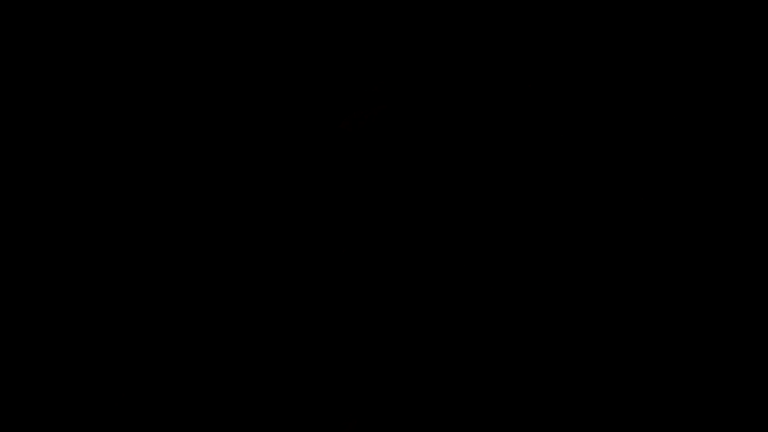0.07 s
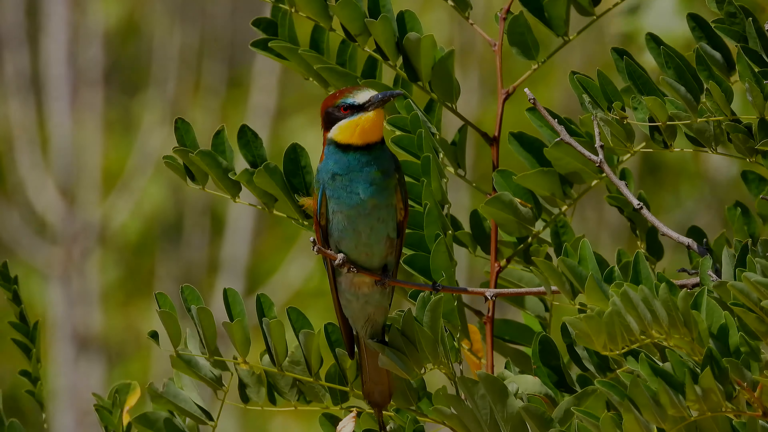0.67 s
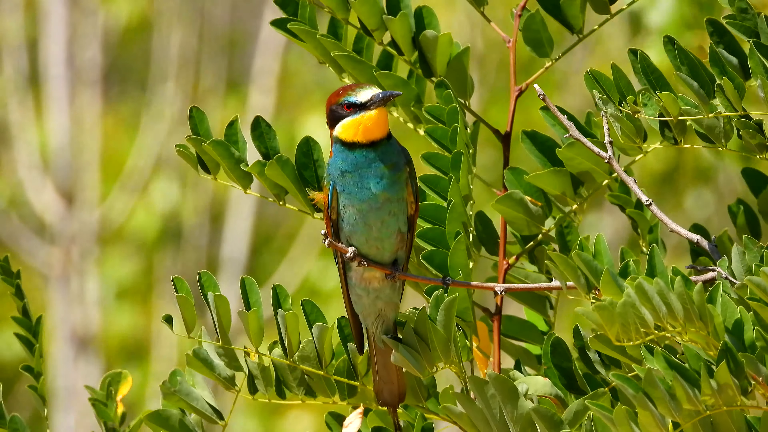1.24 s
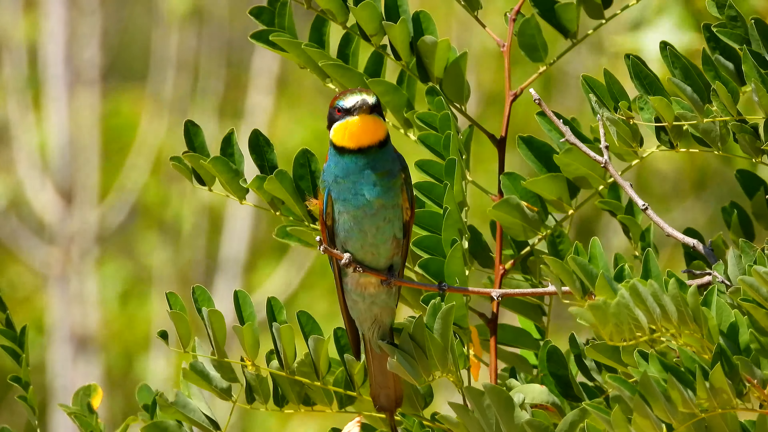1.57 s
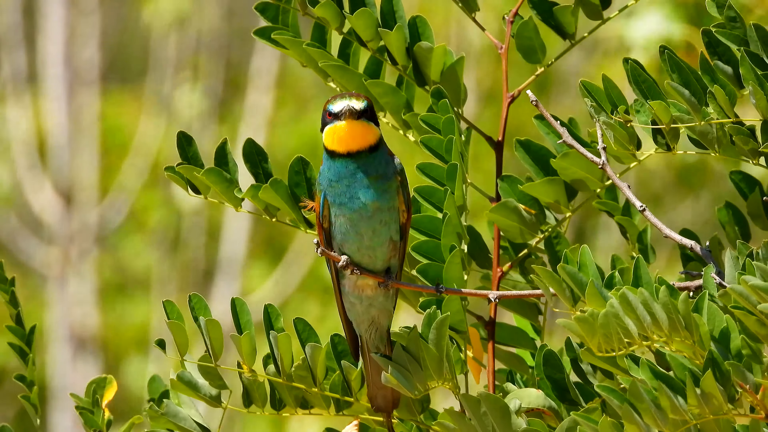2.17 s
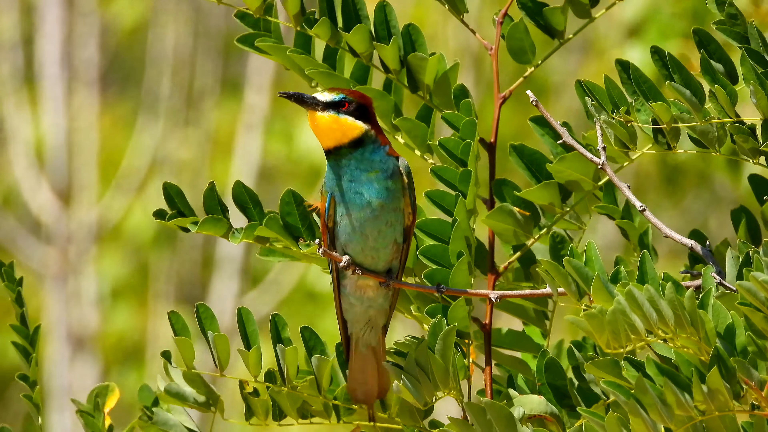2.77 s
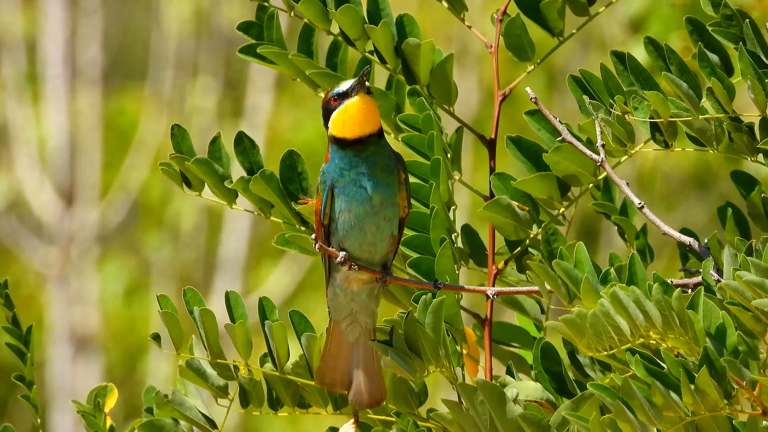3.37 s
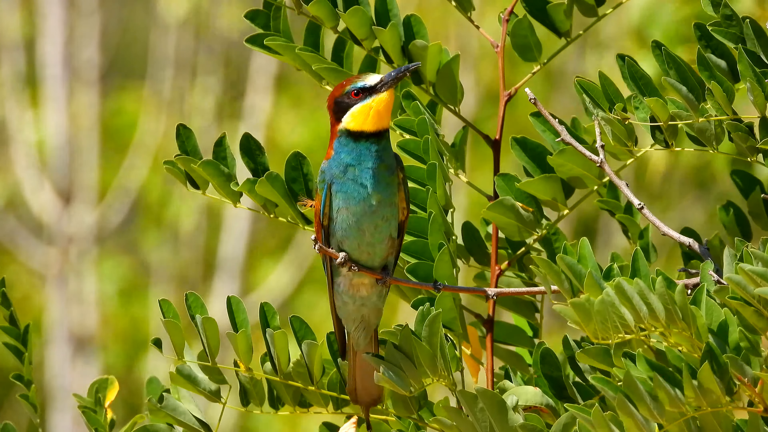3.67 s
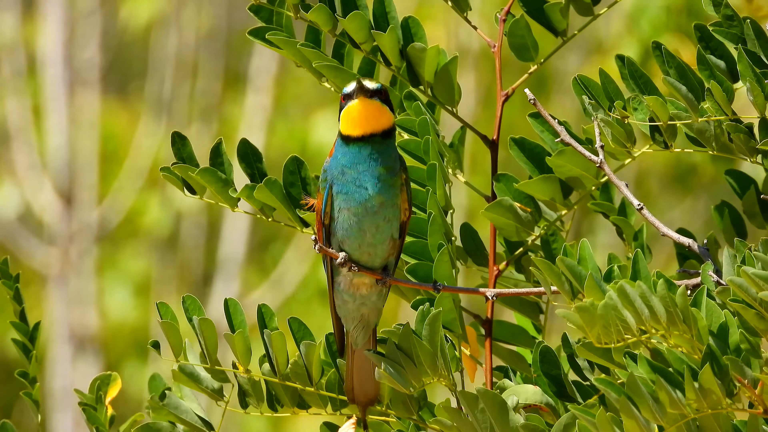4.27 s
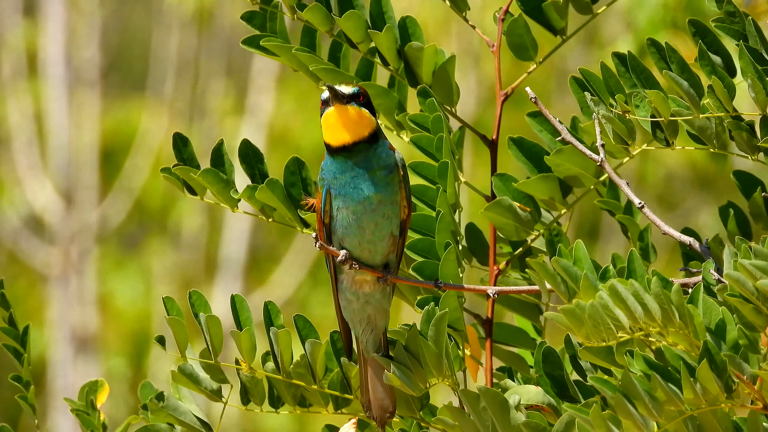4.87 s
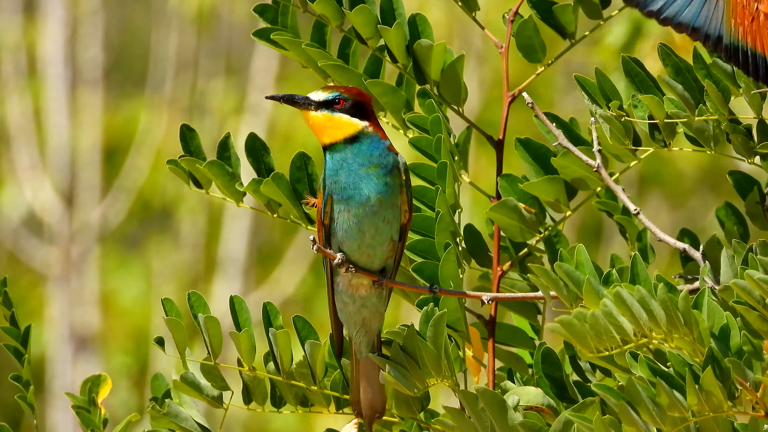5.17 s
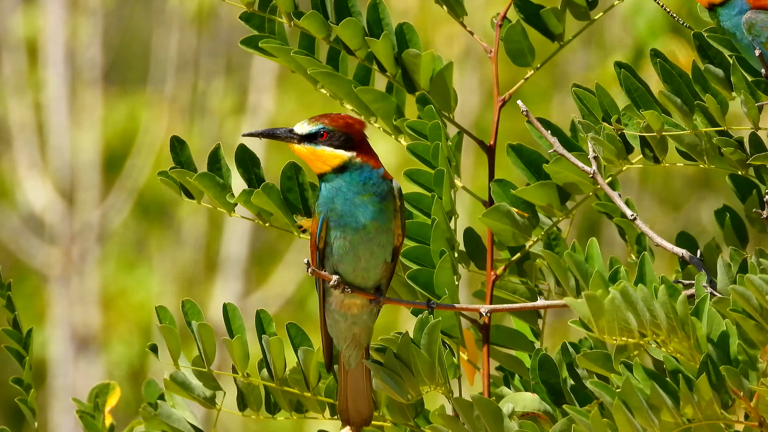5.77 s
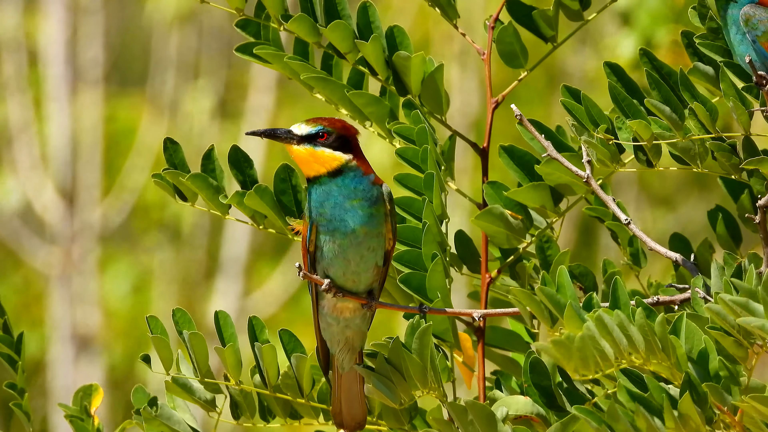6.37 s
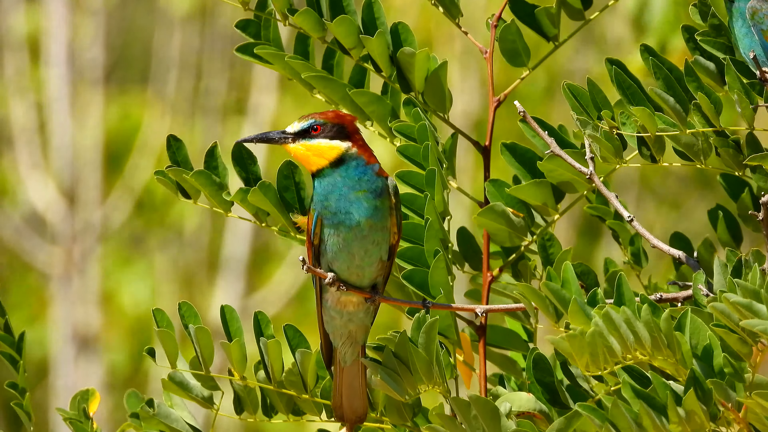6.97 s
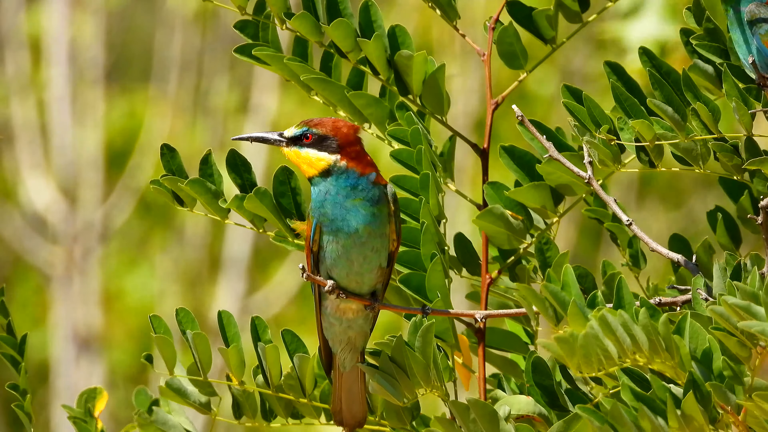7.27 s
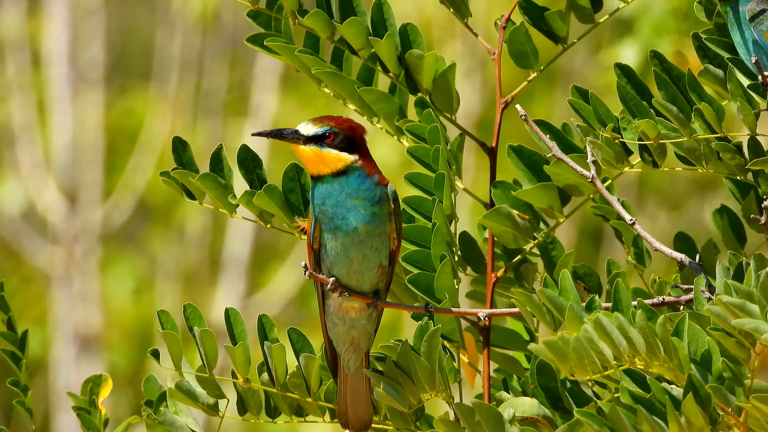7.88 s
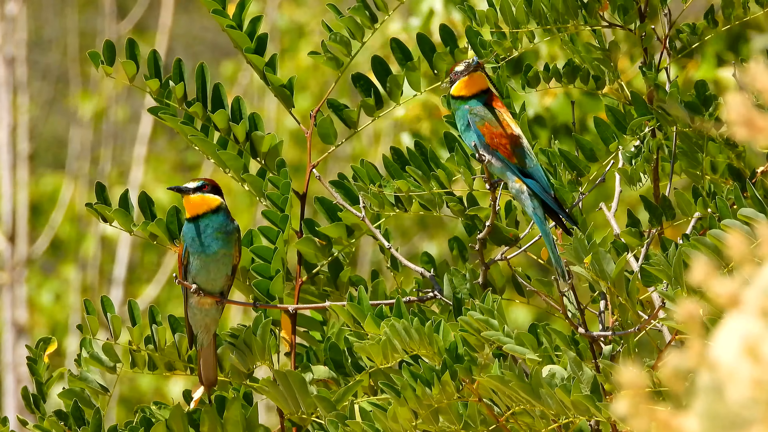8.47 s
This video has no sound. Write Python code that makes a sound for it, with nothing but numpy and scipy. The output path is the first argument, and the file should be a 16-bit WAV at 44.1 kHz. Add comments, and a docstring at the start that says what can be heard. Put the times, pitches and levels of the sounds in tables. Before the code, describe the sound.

A flock of bee-eaters fades in, giving short rolling calls at a distance, softly blurred by the surrounding leaves. About three seconds in, one bird close to the microphone starts a run of slurred whistles, sharp pips and a couple of liquid rolls. It stops around six seconds and the flock carries on. A small songbird twitters very faintly, over a light outdoor hiss and rumble.

```python
"""Bee-eaters in leafy trees

One close bird whistles slurred calls that sink to a whine and end in sharp pips, and a few liquid rolls.
The flock gives the same roll further off, smeared by echoes from the leaves. A small songbird twitters
in bouts and another gives thin calls, over a faint hiss and rumble. The whole sound fades in."""
import sys
import numpy as np
from scipy import signal
from scipy.fft import rfft, irfft, next_fast_len
from scipy.io import wavfile
from scipy.ndimage import uniform_filter1d, minimum_filter1d, map_coordinates

SR = 44100
rng = np.random.default_rng(int(sys.argv[2]) if len(sys.argv) > 2 else 0)


def dump(signal):
    """Clip the signal to [-1, 1] and save it as 16-bit WAV at the path in sys.argv[1]."""
    limited = np.clip(np.atleast_2d(signal).T, -1, 1)
    pcm = np.round(limited * 32767).astype(np.int16)
    wavfile.write(sys.argv[1], SR, pcm)


N = 379701

# a roll is a run of flicks (quick jumps in pitch); this is its rhythm at normal pace
LEAD_S, SECOND_FLICK_S, FLICK_GAP_S, CLOSE_S = .043, .026, .0125, .034


def close_bird(edge_s=.005, echo_db=-19, fizz_db=-58):
    """The nearest bee-eater: slurs, pips that cut into their whines, and rolls."""
    # slurred calls: start_s, loud_s, top_hz, whine_hz, level_db, whine_db
    slurs = [(3.203, 0.016, 2298, 1426, -9.5, -37.5), (3.391, 0.042, 2080, 1543, -8, -29),
             (3.641, .028, 2500, 1510, -8.5, -30), (4.56, 0.033, 2425, 1489, -6.5, -29.5),
             (4.745, 0.021, 2426, 1589, -5, -25), (4.986, .031, 2499, 1547, -4.5, -25.5),
             (5.254, .029, 2448, 1507, -5, -30.5)]
    # sharp pips: start_s, length_s, pitch_hz, glide_hz, level_db
    pips = [(3.361, 0.011, 1799, -52.5, -17.5), (3.52, 0.011, 1790, -200, -11.5),
            (3.55, 0.023, 1780, -200, -9), (3.804, .027, 1682, -280, -12.5), (4.722, 0.014, 1893, 305, -12),
            (4.871, .013, 1885, -150, -7), (4.9, 0.023, 1786, -150, -4.5), (5.155, .016, 1718, -380, -10),
            (5.42, 0.018, 1737, -27, -10.5), (5.454, 0.019, 1808, 24, -8.5),
            (5.472, .009, 1945, -280, -9.5)]
    # liquid rolls: start_s, length_s, pitch_hz, level_db
    rolls = [(4.103, 0.14, 1727, -13), (5.963, .143, 1746, -13)]
    voice = np.zeros(N)
    for start_s, *shape in slurs:
        add(voice, start_s, slur(*shape))
    for start_s, length_s, *shape in pips:
        voice *= 1 - gate(np.arange(N) / SR - start_s, length_s, edge_s)  # make room for the pip
        t = np.arange(-edge_s / 2, length_s + edge_s / 2, 1 / SR)
        add(voice, start_s - edge_s / 2, gate(t, length_s, edge_s) * pip(t, length_s, *shape))
    for start_s, length_s, pitch_hz, level_db in rolls:
        add(voice, start_s, amp(level_db) * close_roll(length_s, pitch_hz))
    # a faint fizz rises and falls with the loud notes
    fizz = amp(fizz_db) * voice * rng.standard_normal(N)
    return voice + fizz + amp(echo_db) * leaf_echo(voice)[:N]


def slur(loud_s, top_hz, whine_hz, level_db, whine_db, soft_db=19, sag_db=6, break_db=9, swell_db=3):
    """A loud upward sweep breaks near its top and sinks to a soft whine that creeps higher and louder."""
    length_s, attack_s, rise_s, fall_s, climb_s = .19, .01, .029, .033, .11
    start_hz, climb_hz = 1468, 183
    t = np.arange(int(length_s * SR)) / SR
    rise, fall, whine = np.clip([t / rise_s, (t - rise_s) / fall_s, (t - rise_s - fall_s) / climb_s], 0, 1)
    hz = start_hz + (top_hz - start_hz) * rise * (1 + .5 * (1 - rise))
    hz += (whine_hz - top_hz) * np.sin(np.pi / 2 * fall) ** 1.9 + climb_hz * whine ** 2
    onset = np.maximum(1 - t / attack_s, 0) ** 1.7
    broken = gate(t - loud_s, 1, .005)
    sweep_db = level_db - soft_db * onset - sag_db * rise - break_db * broken
    db = sweep_db + (whine_db - sweep_db) * fall ** 2 + swell_db * whine
    return gate(t - .003, length_s - .006, .006) * close_voice(hz, db)


def pip(t, length_s, pitch_hz, glide_hz, level_db, scoop_hz=190, taper_db=4):
    """A pip scoops down in pitch and up again, and is loudest in its middle."""
    place = np.clip(2 * t / length_s - 1, -1, 1)  # -1 at the start, 1 at the end
    hz = pitch_hz + glide_hz * place / 2 + scoop_hz * place ** 2
    return close_voice(hz, level_db - taper_db * place ** 2)


def close_roll(length_s, pitch_hz, soft_db=17, dip_db=24, fade_db=20):
    """A nearby roll swells at first, breaks at each flick and dies away as it slides down."""
    t, pitch, flick, closing = roll_shape(length_s, depth=.26, lift=.1, uneven=.14, pace=1,
                                          flick_s=.0025, later_size=.88, start_pitch=.83, slide=.28)
    onset = np.maximum(1 - t / (LEAD_S + SECOND_FLICK_S), 0) ** 2
    db = -soft_db * onset - dip_db * flick ** 2 - fade_db * closing
    return unit(gate(t - .002, length_s - .004, .004) * close_voice(pitch_hz * pitch, db))


def roll_shape(length_s, depth, lift, uneven, pace, flick_s, later_size, start_pitch, slide, vary_db=2):
    """The tune of a roll, as a pitch ratio: a rising lead-in, a run of flicks, then a slide down."""
    t = np.arange(int(length_s * SR)) / SR
    jitter, strength = rng.standard_normal((2, 12))
    gaps = np.r_[LEAD_S, SECOND_FLICK_S, np.full(len(jitter) - 2, FLICK_GAP_S)]
    times = np.cumsum(gaps + uneven * FLICK_GAP_S * jitter) / pace
    sizes = np.r_[1, later_size * amp(vary_db * strength[1:])]
    flick = (sizes[:, None] * np.exp(-((t - times[:, None]) / flick_s) ** 2)).max(axis=0)
    closing = np.clip(1 - (length_s - t) / CLOSE_S, 0, 1)
    lead_in = start_pitch + (1 - start_pitch) * np.sin(np.pi / 2 * np.minimum(t / LEAD_S, 1)) ** .796
    lifted = lift * np.clip((t - times[1]) / FLICK_GAP_S + 1, 0, 1)
    pitch = (lead_in + lifted + depth * flick * (1 - closing)) * (1 - slide * closing ** 2)
    return t, pitch, flick, closing


def close_voice(hz, db, quaver=.02, flutter_db=1.54, reedy_db=5):
    """The close bird's whistle trembles in pitch and level; its low whines have a stronger octave."""
    hz = hz * (1 + quaver * wobble(400, len(hz)))
    level = amp(db + flutter_db * wobble(290, len(hz)))
    return level * whistle(hz, octave_db=reedy_db * np.interp(hz, [1550, 1800], [1, 0]))


def whistle(hz, octave_db, upper_db=-12, rasp=.14):
    """A bird's voice organ, the syrinx, makes an almost pure tone with weak, raspy overtones."""
    # base strength of an overtone next to the main tone: overtone_hz, gain_db
    overtones = [(2900, -23), (3300, -43), (3700, -33.5), (4100, -42), (4600, -28.5), (5200, -37),
                 (5800, -34), (6400, -38.5), (7000, -55), (9900, -51), (11000, -51), (13500, -45)]
    phase = 2 * np.pi * np.cumsum(hz) / SR
    shake = rasp * wobble(700, len(hz))
    octave, *upper = [amp(along(overtones, k * hz)) * np.sin(k * phase + k * (k - 1) * shake)
                      for k in range(2, 6)]
    return np.sqrt(2) * (np.sin(phase) + amp(octave_db) * octave + amp(upper_db) * sum(upper))


def flock(dull_db=6, max_share=.7):
    """The further off a bird sits, the duller its roll and the more of it arrives as leaf echo."""
    # the flock's rolls: start_s, length_s, pitch_hz, level_db, echo_share (0 to 1)
    rolls = [(0.144, 0.056, 2060, -48.5, 0.4), (0.233, 0.11, 1900, -45, 0.1),
             (0.465, 0.13, 1842, -37.5, 0.28), (0.64, .12, 1852, -40.5, .6), (0.892, 0.17, 1868, -40, 0.17),
             (0.956, 0.13, 1860, -43, 0.54), (1.153, .153, 1845, -39.5, .5),
             (1.366, 0.075, 1810, -50.5, 0.12), (1.46, 0.15, 1860, -38.5, 0.3),
             (1.529, .08, 1897, -37, 0.3), (1.735, 0.2, 1860, -41.5, 0), (1.83, 0.17, 1885, -40, 0.18),
             (1.874, 0.091, 1844, -39, 0.5), (2.011, .148, 1891, -38.5, 0.3),
             (2.085, 0.15, 1935, -41.5, 0.3), (2.359, 0.18, 1877, -36, 0.31),
             (2.46, 0.085, 1862, -39, 0.63), (2.615, 0.12, 1917, -37.5, 0.2),
             (2.758, 0.15, 1615, -53.5, 0.2), (2.871, 0.14, 1975, -35.5, .55),
             (2.948, 0.13, 1821, -34, 0.5), (3.335, 0.12, 1870, -22.5, .5), (3.574, 0.12, 1940, -40.5, 0.7),
             (3.711, .14, 1890, -26.5, .1), (3.855, 0.12, 1822, -45, .4), (4.012, .1, 1937, -30, 0),
             (4.297, 0.14, 1883, -33, 0.2), (4.378, 0.12, 1919, -28, .5), (4.78, 0.17, 1810, -27.5, 0.7),
             (5.085, 0.11, 1938, -22.5, 0.17), (5.199, 0.12, 1990, -30.5, 0.8),
             (5.326, 0.14, 1952, -28, 0.1), (5.521, 0.12, 1860, -31, 0.3), (5.601, 0.14, 1959, -32.5, 0.3),
             (5.745, 0.093, 1890, -32, 0), (5.898, 0.18, 1890, -29, 0.2), (6.064, 0.099, 1820, -37, .55),
             (6.141, .12, 1855, -35.5, .4), (6.274, 0.13, 1914, -34, 0.4), (6.355, 0.12, 1806, -37.5, 0.2),
             (6.471, .121, 1948, -28, .03), (6.598, 0.13, 1868, -32.5, 0.33),
             (6.833, 0.17, 1989, -39.5, 0.2), (6.876, 0.13, 1785, -38.5, 0), (7.021, 0.12, 1810, -40, .15),
             (7.061, 0.11, 1962, -39, .6), (7.196, 0.1, 1856, -34.5, 0.6), (7.335, .149, 1868, -34, .35),
             (7.529, 0.15, 1830, -33.5, 0.56), (7.723, 0.15, 1828, -31.5, 0.62),
             (7.765, .127, 1927, -33.5, 0.2), (7.903, 0.089, 1830, -43.5, 0),
             (8.031, 0.13, 1892, -34.5, 0.25), (8.171, 0.13, 1883, -38.5, 0.5),
             (8.29, 0.16, 1872, -37, 0.54), (8.371, 0.11, 1883, -33.5, 0.5), (8.554, 0.17, 1859, -34, 0.77)]
    out = np.zeros(N)
    for start_s, length_s, pitch_hz, level_db, echo_share in rolls:
        call = amp(level_db) * far_roll(length_s, pitch_hz, dull_db * echo_share)
        echo_share = min(echo_share, max_share)
        add(out, start_s, np.sqrt(1 - echo_share) * call)
        add(out, start_s, np.sqrt(echo_share) * leaf_echo(call))
    return out


def far_roll(length_s, pitch_hz, dull_db, dip_db=6, fade_db=3, soft_db=3, quaver=.011, flutter_db=1.5):
    """A distant roll is slower, duller and less even; its octave is clearest on the lead-in."""
    # how strong the voice is across its range: pitch_hz, gain_db
    voice_range = [(1200, -37.5), (1400, -3.5), (1600, -0.5), (1850, 0.5), (2200, 3.5), (2450, 17),
                   (2700, -14)]
    t, pitch, flick, closing = roll_shape(length_s, depth=.16, lift=.012, uneven=.56, pace=.87,
                                          flick_s=.004, later_size=1, start_pitch=.73, slide=.34)
    hz = pitch_hz * pitch * (1 + quaver * wobble(150, len(t)))
    onset = np.maximum(1 - t / LEAD_S, 0)
    db = along(voice_range, hz) - soft_db * onset - dip_db * flick ** 2 - fade_db * closing ** 2
    level = amp(db + flutter_db * wobble(60, len(t))) * gate(t - .005, length_s - .01, .01)
    octave_db = np.interp(t, [LEAD_S, 2 * LEAD_S], [6, 0])
    return unit(level * whistle(hz, octave_db - dull_db, upper_db=-12 - dull_db, rasp=.07))


def peeps(length_s=.016, arch_hz=130, edge_s=.0017):
    """Short high peeps from the flock, each one small rise and fall in pitch."""
    # peeps: start_s, pitch_hz, level_db
    notes = [(1.179, 2330, -43), (1.222, 2535, -49), (2.474, 2603, -40), (2.698, 2490, -48),
             (7.059, 2617, -43.5), (8.301, 2520, -48)]
    out = np.zeros(N)
    t = np.arange(-edge_s / 2, length_s + edge_s / 2, 1 / SR)
    for start_s, pitch_hz, level_db in notes:
        hz = pitch_hz - arch_hz * (2 * t / length_s - 1) ** 2
        peep = gate(t, length_s, edge_s) * whistle(hz, octave_db=-1)
        add(out, start_s - edge_s / 2, amp(level_db) * peep)
    return out


def chorus(count=60, dull_db=8):
    """Many birds far away overlap into a warbling wash."""
    # loudness of the farthest birds together: time_s, level_db
    loudness = [(0, -70), (1.3, -48.5), (2.3, -57.5), (2.8, -48.5), (3.5, -35), (6.5, -38.5), (6.8, -46),
                (7.2, -35), (8, -44.5), (8.6, -44.5)]
    out = np.zeros(N)
    for i, (shift, stretch, detune) in enumerate(rng.uniform(-1, 1, (count, 3))):
        call = far_roll(.13 + .03 * stretch, 1920 + 100 * detune, dull_db)
        start_s = (i + shift / 2) * N / SR / count
        add(out, start_s, call)
        add(out, start_s, leaf_echo(call))
    level_db = np.interp(np.arange(N) / SR, *np.transpose(loudness))
    return amp(level_db) * unit(out)


def leaf_echo(call, low_hz=1650, high_hz=3000, slope_hz=220, build_s=.0012):
    """Leaves and trunks return a dense echo with the call's energy, but few of its lows and highs."""
    # time the echo takes to fall by 60 dB: frequency_hz, decay_s
    decay = [(1500, 0.23), (2200, 0.31), (6000, 0.088)]
    bands, t, noise = signal.stft(rng.standard_normal(SR // 2), SR, nperseg=256)
    hz = bands[:, None]
    thrown_back = (1 + np.tanh((hz - low_hz) / slope_hz)) / (1 + (hz / high_hz) ** 4)
    envelope = amp(-60 * t / along(decay, hz)) * (1 - np.exp(-t / build_s))
    tail = signal.istft(noise * thrown_back * envelope, SR, nperseg=256)[1]
    echo = signal.fftconvolve(call, tail)
    return echo * np.linalg.norm(call) / np.linalg.norm(echo)


def thin_calls(arch=.1, hoarse=.022, edge_s=.02):
    """Another small bird gives thin, hoarse calls that rise and fall a little in pitch."""
    # calls: start_s, length_s, pitch_hz, level_db
    calls = [(1.815, 0.037, 4280, -67), (2.241, 0.034, 4750, -67), (2.9, 0.067, 4400, -60),
             (4.401, .13, 3910, -53), (6.386, .12, 4200, -56)]
    out = np.zeros(N)
    for start_s, length_s, pitch_hz, level_db in calls:
        t = np.arange(-edge_s / 2, length_s + edge_s / 2, 1 / SR)
        hz = pitch_hz * (1 - arch * (2 * t / length_s - 1) ** 2 + hoarse * wobble(640, len(t)))
        tone = np.sin(2 * np.pi * np.cumsum(hz) / SR)
        add(out, start_s - edge_s / 2, amp(level_db) * gate(t, length_s, edge_s) * tone)
    return out


def songbird(level_db=-78, length_s=.108, every_s=.199, high_hz=5200, low_hz=4600, sweeps_per_s=30):
    """A small songbird twitters at an even pace; each twitter is a run of raspy downward sweeps."""
    # bouts of twittering: start_s, end_s
    bouts = [(.565, 1.25), (1.408, 1.42), (1.728, 3.7), (6.65, 7.57), (8.01, 8.52)]
    out = np.zeros(N)
    t = np.arange(int(length_s * SR)) / SR
    for start_s in np.concatenate([np.arange(start, end, every_s) for start, end in bouts]):
        sweep = (t * sweeps_per_s + .11 * wobble(30, len(t))) % 1
        hz = (high_hz + (low_hz - high_hz) * sweep) * (1 + .012 * wobble(400, len(t)))
        swell = np.sqrt(np.sin(np.pi * sweep) * np.sin(np.pi * t / length_s))
        twitter = amp(level_db) * unit(swell * np.sin(2 * np.pi * np.cumsum(hz) / SR))
        add(out, start_s, twitter)
        add(out, start_s, leaf_echo(twitter))
    return out


def tick(start_s=6.799, spike_db=-29, cutoff_hz=4500):
    """One faint dry tick: a single spike with its treble softened."""
    out = np.zeros(N)
    add(out, start_s, amp([spike_db]))
    return filtered(out, lambda hz: 1 / (1 + (hz / cutoff_hz) ** 4))


def air(quiet_db=-73, loud_db=-55, loud_from_s=2.7, loud_to_s=6.58, side_db=-13):
    """A faint hiss and rumble, nearly the same in both ears, stronger for a few seconds."""
    # tone colour of the air: frequency_hz, gain_db
    colour = [(12, 9), (28, -8.5), (60, -19), (150, -22), (300, -25.5), (900, -22), (1600, 0), (2900, -3),
              (4600, -9.5), (5300, -20.5), (6200, -26), (7000, -27.5), (10500, -26), (13000, -22),
              (14000, -31)]
    middle, side = unit(filtered(rng.standard_normal((2, N)), lambda hz: amp(along(colour, hz))))
    loud = gate(np.arange(N) / SR - loud_from_s, loud_to_s - loud_from_s, .021)
    level_db = quiet_db + (loud_db - quiet_db) * loud
    return amp(level_db) * (middle + amp(side_db) * np.array([side, -side]))


def thin_hiss(level_db=-88):
    """A steady, very faint treble hiss."""
    return amp(level_db) * unit(np.diff(rng.standard_normal(N + 1)))


def amp(db):
    """Turn decibels into a gain."""
    return 10 ** (np.asarray(db) / 20)


def unit(x):
    """Scale a sound to an average (rms) level of 1."""
    return x / np.sqrt(np.mean(x ** 2) + 1e-20)


def along(points, hz):
    """Read between (frequency, value) points on a log frequency scale."""
    frequencies, values = np.transpose(points)
    return np.interp(np.log(hz + 1), np.log(frequencies), values)


def wobble(rate, size):
    """A smooth curve, size samples long, through rate random points a second."""
    points = rng.standard_normal(int(size * rate / SR) + 4)
    return map_coordinates(points, [np.arange(size) * rate / SR])


def filtered(x, response):
    """Scale each frequency of a sound by response(hz)."""
    size = next_fast_len(N + SR // 2)
    return irfft(rfft(x, size) * response(np.fft.rfftfreq(size, 1 / SR)), size)[..., :N]


def add(track, start_s, sound):
    """Mix a sound into a track."""
    start = int(np.clip(round(start_s * SR), 0, N))
    track[..., start:start + sound.shape[-1]] += sound[..., :N - start]


def gate(t, length_s, edge_s):
    """A gain that opens softly around time 0 and closes around length_s."""
    return np.sin(np.pi / 2 * np.clip(np.minimum(t, length_s - t) / edge_s + .5, 0, 1)) ** 2


def scene(fade_in_s=1.37):
    """The birds are ahead, a hair to the left; everything fades in, and out quickly at the very end."""
    t = np.arange(N) / SR
    birds = close_bird() + flock() + peeps() + chorus() + songbird() + thin_calls()
    fade = np.minimum(t / fade_in_s, 1) ** 1.2 * gate(t, (N - 200) / SR, .024)
    return fade * (birds * amp([[.1], [-.1]]) + air() + thin_hiss() + tick())


def record(dry, ceiling=.95, top_hz=14000):
    """A gentle limiter turns down any peak over the ceiling; everything above top_hz is cut."""
    needed = np.minimum(1, ceiling / (np.abs(dry).max(axis=0) + 1e-9))
    held = minimum_filter1d(needed, size=300)
    gain = uniform_filter1d(uniform_filter1d(held, size=150), size=150)
    return filtered(dry * gain, lambda hz: hz < top_hz)


dry = scene()
out = record(dry)
dump(out)
```